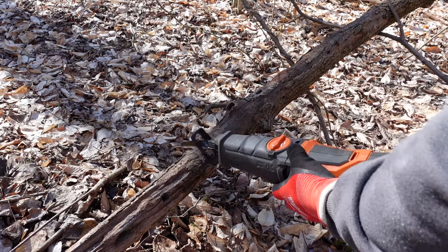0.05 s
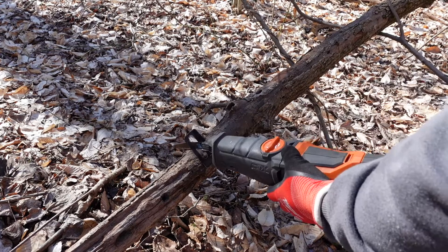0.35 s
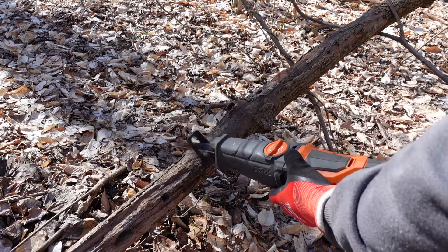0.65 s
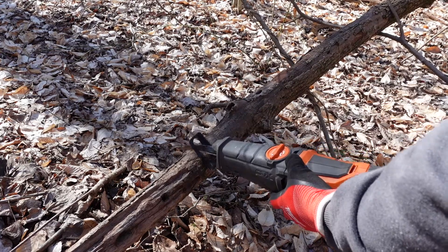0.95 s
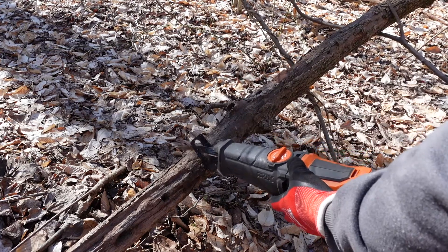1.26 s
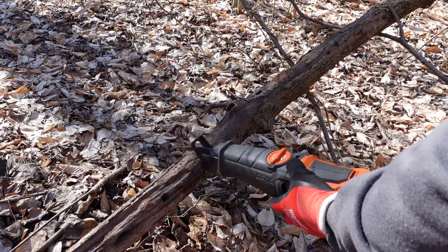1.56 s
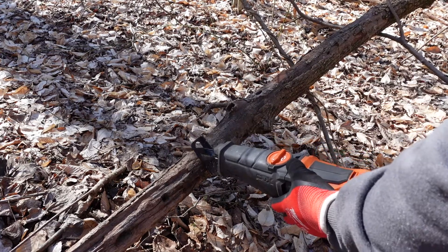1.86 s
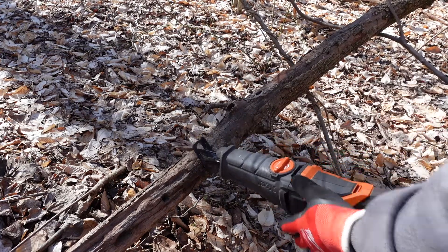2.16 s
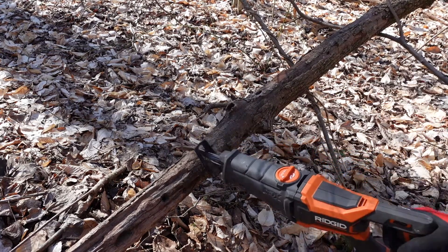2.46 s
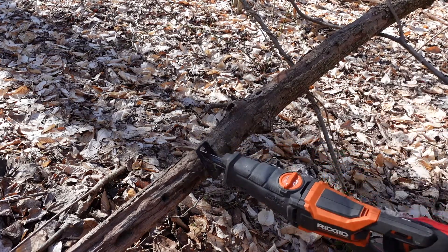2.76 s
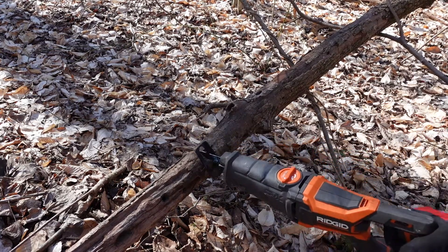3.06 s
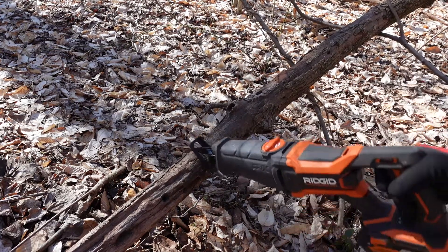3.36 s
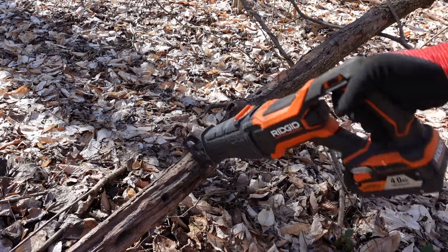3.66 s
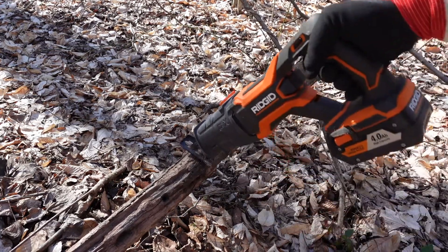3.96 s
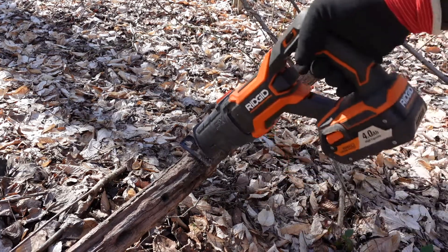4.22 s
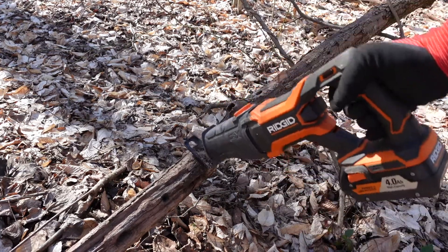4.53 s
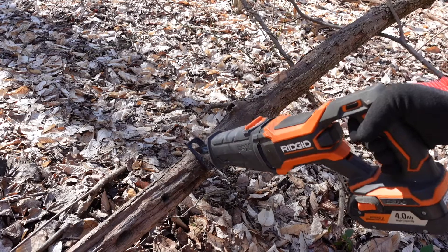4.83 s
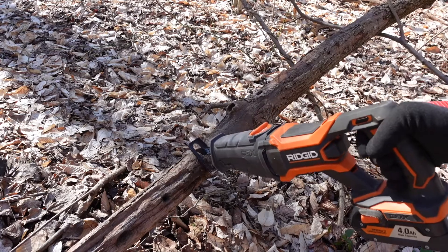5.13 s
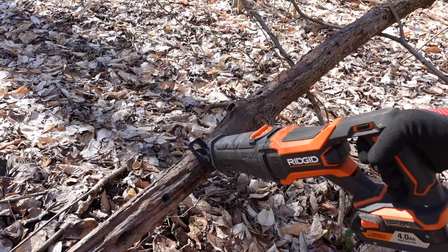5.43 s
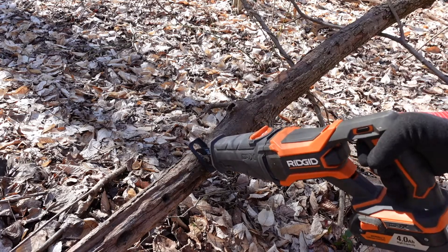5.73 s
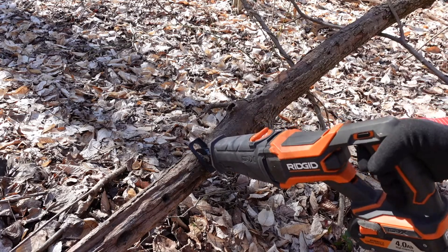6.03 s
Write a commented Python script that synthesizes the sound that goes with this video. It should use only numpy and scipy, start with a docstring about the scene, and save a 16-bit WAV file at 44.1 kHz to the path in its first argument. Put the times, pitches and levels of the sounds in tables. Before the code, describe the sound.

A cordless reciprocating saw rasps through a log close by, jamming three times with a sliding gear whine, the last one holding.

```python
"""A leafy forest floor: a cordless reciprocating saw with a failing drive cuts a log, close by.
Each stroke clatters in the gear housing, shakes the log and rasps in the cut; under load the gear
teeth skip in short chirps. Three times the blade jams and the teeth skip without pause: a whine that
slides down as the motor sags and, in the last jam, holds. Leaves stir and the trigger clicks first;
faint air and a low hum lie behind."""
import sys
import numpy as np
from scipy import signal
from scipy.fft import rfft, irfft, next_fast_len
from scipy.io import wavfile
from scipy.ndimage import uniform_filter1d, minimum_filter1d

SR = 44100
rng = np.random.default_rng(int(sys.argv[2]) if len(sys.argv) > 2 else 0)


def wav_record(signal):
    """Record a signal, one row per channel, as 16-bit PCM in the file named by sys.argv[1]."""
    frames = np.transpose(np.atleast_2d(signal))
    bounded = np.clip(frames, -1, 1)
    # unit amplitude maps onto the largest positive 16-bit level
    quanta = np.round(bounded * 32767).astype(np.int16)
    wavfile.write(sys.argv[1], SR, quanta)


N = 268436
TIME = np.arange(N) / SR
MOTOR_ON_S = 0.42

# Motor pace, first and second spell. Each row: time in seconds, strokes per second.
PACE_FIRST = [(0.42, 29.909), (0.563, 35.831), (0.646, 41.428), (1.065, 40.815), (1.366, 36.644),
              (1.467, 34.457), (2.044, 32.887), (2.258, 34.563), (2.353, 31.606), (2.81, 27.714),
              (3.0, 28.151)]
PACE_SECOND = [(3.52, 16.657), (3.677, 31.283), (3.995, 39.901), (4.297, 40.833), (4.567, 35.657),
               (4.72, 27.954), (4.873, 27.951), (5.1, 24.124)]
def sawing(pace, clatter, blade_modes, lead_turns, return_turns,
           chirp_db, ring_db, clatter_db, log_db, rasp_db):
    """One spell of cutting: the strokes drive gears, log and blade. A slower saw is more loaded."""
    rate, = curves(pace)
    start_s, end_s = pace[0][0], pace[-1][0]
    turns = np.cumsum(rate * (TIME > start_s)) / SR + lead_turns
    load = np.clip((41 - rate) / (41 - 28), 0, 1)  # free at 41 strokes/s, full load at 28
    swing = (turns + .014 * wander(48.6) + .5) % 1 - .5
    pull, force, snap = strokes(rate, turns, swing, load, return_turns)
    tooth_turns, chirps = tooth_chirps(swing, load)
    skip_share = np.clip(amp(chirp_db) * load ** 0.72 * pull, 0, .85)
    gears = gear_clatter(force + .35 * snap, load, skip_share, tooth_turns, clatter, blade_modes, ring_db)
    gears += skip_share * force * chirps
    sound = amp(clatter_db) * gears + log_body(force, load, log_db) + rasp(force, snap, load, rasp_db)
    spin_up = np.clip((TIME - MOTOR_ON_S) / 0.12, 0, 1)
    return during(start_s - .003, end_s - .006, fade_s=0.036) * amp(-8.5 * (1 - spin_up ** 3)) * sound


# The saw bucks as it bites: long and short pulls alternate.
# Each row: time in seconds, change of pull length as a fraction.
BUCKING = [(1.27, 0.21), (1.42, 0.61), (1.5, 0.36), (1.66, 0.044)]
def strokes(rate, turns, swing, load, return_turns, snap_s=0.0025):
    """Stroke envelopes: the gears take up slack with a snap, pull, let go and knock on the return."""
    buck, = curves(BUCKING)
    centre = .085 - 0.11 * np.sqrt(load)
    half_width = (0.13 + 0.11 * np.sqrt(load)) * (1 - buck * np.cos(np.pi * turns))
    since_bite = swing - centre + half_width
    until_release = centre + half_width - swing
    pull = (1 + np.tanh(since_bite / .026)) * (1 + np.tanh(until_release / .045)) / 4
    return_knock = bump(swing, -return_turns - 0.068 * load, .09 - 0.067 * load)
    return_knock *= (.7 - 0.55 * load) * amp(1.5 * wander(26))
    force = (.36 - 0.085 * load + pull + return_knock) * amp(2.34 * wander(194))
    gears_catch_s = SLIPS[0][1]
    force **= np.clip((TIME - gears_catch_s) / 0.019 + 1, .2, 1)  # strokes stand out from here on
    force /= np.sqrt(uniform_filter1d(force ** 2, 5000))
    snap = np.exp(-(since_bite % 1) / rate / snap_s) * amp(2 * wander(18))
    return pull, force, snap


def tooth_chirps(swing, load):
    """Gear teeth skip under load, fastest mid-pull. Returns tooth phase and tone."""
    peak_hz = 890 + 380 * np.clip(1 - 1.9 * load, 0, 1)
    tooth_hz = peak_hz * np.exp(-3.4 * (swing + .04) ** 2 + .06 * wander(21.95))
    tooth_turns = np.cumsum(tooth_hz) / SR + 0.0095 * wander(525)
    tone = sum(np.cos(2 * np.pi * (k * tooth_turns + rng.random())) * amp(db + 5.9 * wander(54))
               for k, db in enumerate([4.5, 4.5, 5.5, 0.0, -3.5, -23.5], 1))
    return tooth_turns, unit(tone)


# Gear clatter spectrum per spell. Each row: frequency in Hz, relative level in dB.
GEARS_FIRST = [(290, -34), (500, -21), (821, -7.5), (972, -8.5), (1220, -2), (1640, -2.5), (2030, -2.5),
               (2350, -4), (2780, -5), (4100, -8), (4740, -10.5), (6980, -14.5), (9000, -21.5),
               (11700, -41), (19800, -120)]
GEARS_SECOND = [(290, -55), (500, -16.5), (821, -5), (961, -3.5), (1450, -1.5), (1940, 2.5), (2440, -0.5),
                (3420, 1), (4360, -5), (5040, -3.5), (5680, -9.5), (6340, -7.5), (9000, -16.5),
                (11700, -32), (19800, -120)]
# Modes of the housing and, per spell, the free blade. Each row: centre in Hz, width in Hz, gain in dB.
HOUSING_MODES = [(776, 23, -2), (11350, 150, 0)]
BLADE_MODES_FIRST = [(2470, 240, 0), (9300, 990, 0)]
BLADE_MODES_SECOND = [(2180, 300, 7), (6100, 300, 1.8)]
def gear_clatter(force, load, skip_share, tooth_turns, spectrum, blade_modes, ring_db):
    """Gear blows ring housing and blade; wood damps the blade as the cut tightens."""
    tooth_beat = unit(1 + 0.46 * skip_share * np.cos(2 * np.pi * tooth_turns))
    blows = impacts(6500, 2.16) * force * np.sqrt(1 - skip_share ** 2) * tooth_beat
    blade_share = np.clip(amp(ring_db) * (1 - load) ** 2, 0, 1)
    housing = colour(blows * (1 - blade_share), spectrum, HOUSING_MODES)
    return housing + colour(blows * blade_share, spectrum, blade_modes)


# Log body spectrum. Each row: frequency in Hz, relative level in dB.
LOG_SPECTRUM = [(40, -29), (100, -21.5), (200, -9), (330, -4), (480, 3.5), (620, 7.5), (900, -8)]
def log_body(force, load, level_db, full_load_db=-8.5):
    """Strokes shake the log, less under load as the blade removes less wood."""
    blows = impacts(2500, 3.1) * force ** 0.53
    return amp(level_db + full_load_db * load ** 1.43) * colour(blows, LOG_SPECTRUM)


# Spectrum of the cut. Each row: frequency in Hz, relative level in dB.
RASP_SPECTRUM = [(5000, -59), (7500, -8), (9200, 2.5), (10600, -2.5), (11400, -4), (12500, -5.5),
                 (15500, -14.5)]
def rasp(force, snap, load, level_db, full_load_db=-2.5):
    """The blade tears off chips: a high hiss, sharpest as each pull starts."""
    chips = impacts(14000, 4.5) * (force ** 0.73 + 1.14 * snap)
    return amp(level_db + full_load_db * load) * colour(chips, RASP_SPECTRUM, HOUSING_MODES)


# Unbroken tooth skipping: once at start-up, then three jams. Each row: start and end in seconds,
# catch and held rate in Hz, sag time in seconds, end rate in Hz, collapse time in seconds,
# then gains in dB of the rattle and of partials 1, 2, 3 and above.
SLIPS = [(0.443, 0.515, 850, 1475, 0.019, 830, 0.024, -25, -2, -13, -20, -6),
         (2.997, 3.163, 1660, 1440, .09, 759.4, .04, -20, 2, -5, 0, 2),
         (3.186, 3.512, 1600, 1375, 0.044, 780, .115, -21.5, -3, -1.5, 1.5, -1),
         (5.096, 6.114, 1730, 962.8, .073, 944, .02, -21, -5.5, 3, 0.5, -1)]
def jams(limp_at_s=5.16, limp_rise_s=.19, limp_droop=.037, thud_db=-64):
    """Gear teeth ratchet: whine, rattle, thud. The last jam limps, every second tooth striking harder."""
    gates = np.array([during(*row[:2]) for row in SLIPS])
    tooth_hz = np.choose(gates.argmax(0), [skipping_rate(*row[:7]) for row in SLIPS])
    rattle_gain, *partial_gains = amp([row[7:] for row in SLIPS]).T @ gates
    limp = 1 - np.exp(-(np.maximum(TIME - limp_at_s, 0) / limp_rise_s) ** 1.396)
    runout = (.014 - .007 * limp) * np.sin(2 * np.pi * 13.5 * TIME)  # the wheel runs out of true
    wobble = runout + .004 * wander(49) + .004 * wander(8)
    jitter_turns = (0.027 + 0.01 * limp) * wander(210)
    tooth_turns = np.cumsum(tooth_hz * (1 + wobble - limp_droop * limp)) / SR + jitter_turns
    whine = jam_whine(tooth_hz, tooth_turns, limp, partial_gains)
    rattle = jam_rattle(tooth_turns, limp)
    thud = amp(thud_db) * gates.sum(0) * colour(impacts(2800, 1.3), LOG_SPECTRUM)
    in_step = sum(during(start + .008, end - .008, fade_s=.016) for start, end, *_ in SLIPS)
    return in_step * whine + rattle_gain * rattle + thud


def skipping_rate(start_s, end_s, catch_hz, held_hz, sag_s, end_hz, collapse_s):
    """Tooth rate in Hz: the motor is pulled to the pace the slipping teeth allow, then drops at the end."""
    age_s = np.clip(TIME - start_s, 0, end_s - start_s)
    left_s = np.maximum(end_s - TIME, 0)
    hz = held_hz + (catch_hz - held_hz) * np.exp(-(age_s / sag_s) ** 1.8)
    return hz * (1 - (1 - end_hz / held_hz) * np.exp(-left_s / collapse_s))


# Radiation of the saw's body. Each row: frequency in Hz, gain in dB.
BODY_RADIATION = [(800, -19.5), (960, -21.5), (1100, -23), (1270, -29.5), (1420, -22), (1570, -21),
                  (1720, -21), (1870, -17.5), (2060, -28), (2450, -15.5), (2780, -19), (3020, -21.5),
                  (3300, -20), (3650, -26.5), (4100, -32.5), (4650, -28.5), (5150, -25.5), (5750, -37.5),
                  (6400, -31), (7000, -30), (8200, -34.5), (9600, -34), (12000, -46)]
# At full limp: gain change in dB of partials 1, 2, 3 and above; level in dB of orders 0.5 to 3.5.
LIMP_GAINS_DB = [1, -8.5, 0, -2.5]
HALF_ORDERS_DB = [-47, -35.5, -25, -29]
def jam_whine(tooth_hz, tooth_turns, limp, partial_gains):
    """Tooth harmonics slide through the body's resonances; the limp adds half orders."""
    def partial(order):
        return np.sqrt(2) * np.cos(2 * np.pi * (order * tooth_turns + rng.random())) * amp(1.65 * wander(69))

    def radiated(order):
        group = min(int(order), len(partial_gains)) - 1
        hz = order * tooth_hz
        db = db_at(BODY_RADIATION, hz) + LIMP_GAINS_DB[group] * limp + 1.9 * wander(10.5)
        return partial_gains[group] * amp(db) * partial(order) / (1 + (hz / 9000) ** 6)

    harmonics = sum(radiated(k) for k in range(1, 10))
    high_halves = sum(radiated(k + .5) for k in range(4, 10))
    low_halves = sum(amp(db) * partial(k + .5) for k, db in enumerate(HALF_ORDERS_DB))
    return harmonics + limp * (high_halves + low_halves)


# Gear rattle spectrum. Each row: frequency in Hz, relative level in dB.
RATTLE_SPECTRUM = [(100, -60), (300, -35), (550, -13), (750, -3.5), (1100, -2), (1500, 2), (2000, 8),
                   (2700, 9), (3700, 3.5), (5200, 3), (7000, -0.5), (9000, -5.5), (12000, -9), (15500, -19)]
# Jammed blade modes. Each row: centre in Hz, width in Hz, gain in dB.
JAMMED_MODES = [(770, 26, 16.5), (2657, 209, -6.5), (4630, 140, -14), (5328, 138, -9), (6984, 180, -5),
                (8880, 260, 1)]
def jam_rattle(tooth_turns, limp):
    """Blows in step with the teeth; the limp moves the ringing from housing to blade."""
    beat = (1 + 0.12 * np.cos(2 * np.pi * tooth_turns)) * (1 + 0.75 * limp * np.cos(np.pi * tooth_turns))
    blows = impacts(12000, 1.2) * beat * amp(1.9 * wander(100))
    housing = colour(blows * np.sqrt(1 - limp), RATTLE_SPECTRUM, HOUSING_MODES)
    blade = colour(impacts(12000, 2.0) * beat * np.sqrt(limp), RATTLE_SPECTRUM, JAMMED_MODES)
    return housing + blade


def freewheel(level_db=-23):
    """The gears rattle unloaded between the first two jams."""
    return amp(level_db) * during(SLIPS[1][1], SLIPS[2][0]) * colour(impacts(5250, 2.4), RATTLE_SPECTRUM)


# Trigger, shoe and catching gears. Each row: start in seconds, level in dB, decay in seconds.
METAL_KNOCKS = [(0.326, -44, .003), (0.378, -40, 0.0066), (0.394, -32, 0.0091), (0.42, -23, 0.016),
                (2.99, -7, 0.0061), (3.187, -8, 0.0084), (3.517, -17, 0.0024), (5.095, -14.5, 0.0042)]
# Trigger mode. Each row: centre in Hz, width in Hz, gain in dB.
TRIGGER_MODES = [(1770, 220, 19)]
def knocks():
    """Bursts of metal contact ring the trigger before the motor runs, the housing after."""
    force = sum(amp(db) * (TIME >= start_s) * np.exp(-abs(TIME - start_s) / decay_s)
                for start_s, db, decay_s in METAL_KNOCKS)
    blows = force * impacts(9000, 3.7)
    running = TIME > MOTOR_ON_S
    housing = colour(blows * running, GEARS_FIRST, HOUSING_MODES)
    return housing + colour(blows * ~running, GEARS_FIRST, TRIGGER_MODES)


# Leaf stirs. Each row: centre in seconds, level in dB, half-width in seconds.
LEAF_STIRS = [(0.016, -60, 0.025), (0.135, -65, .007), (0.244, -66, 0.012)]
def leaves():
    """Dry leaves crackle as the saw is set on the log."""
    stir = sum(amp(db) * np.exp(-((TIME - at_s) / width_s) ** 2) for at_s, db, width_s in LEAF_STIRS)
    return colour(stir * impacts(2500, 3.7), [(1200, -2), (2500, 0), (6000, -2), (14000, -12)])


def forest_scatter(x, wet_db=-25, t60_s=0.2):
    """Faint reflections off leaves and trunks, much alike on both sides."""
    t = np.arange(SR // 3) / SR
    noise = rng.standard_normal(len(t)) + 0.1 * rng.standard_normal((2, len(t)))
    tail = noise * amp(-60 * t / t60_s) * (t > .002)
    return amp(wet_db) * signal.fftconvolve(x[None], tail / np.linalg.norm(tail[0]), axes=1)[:, :N]


def low_rumble(level_db=-74):
    """A faint low rumble while the saw runs."""
    rumble = colour(rng.standard_normal(N), [(20, 1), (70, -2), (160, -4), (300, 0)])
    return amp(level_db) * during(MOTOR_ON_S, SLIPS[-1][1]) * rumble


# Forest air spectrum. Each row: frequency in Hz, relative level in dB.
AIR_SPECTRUM = [(18, -31), (30, -12), (132, -8.5), (205, -19), (281, -25), (328, -30), (552, -29),
                (754, -17.5), (1060, -14), (1240, -20), (1520, -19), (1830, -27), (3150, -34),
                (6530, -36.5), (15000, -48)]
# Fade of air and hum. Each row: time in seconds, gain in dB.
BACKGROUND_FADE = [(0, -63.5), (.42, -60), (.52, -82)]
def background(hum_hz=68):
    """Still air and a low hum, both sinking away once the saw runs."""
    gain_db, = curves(BACKGROUND_FADE)
    hum = np.sqrt(2) * np.sin(2 * np.pi * hum_hz * TIME + .2 * wander(8)) * (TIME > .035)
    air = colour(rng.standard_normal(N), AIR_SPECTRUM)
    return amp(gain_db) * (amp(3) * air + amp(2) * hum)


# Stereo balance. Each row: frequency in Hz, left minus right in dB.
BALANCE = [(300, 0), (900, -.6), (2200, -.9), (4000, -.6), (5500, -.7), (7000, 0), (15000, 0)]
def placed(x, sway=0.93, flutter=0.014):
    """Sets a sound slightly right, band by band; the balance sways and flutters."""
    side_db = db_at(BALANCE, np.fft.rfftfreq(N, 1 / SR))
    side = irfft(rfft(x) * (amp(side_db / 2) - 1), N) * (1 + sway * wander(9.3))
    side += flutter * x * wander(40)
    return np.array([x + side, x - side])


def amp(db):
    return 10 ** (np.asarray(db) / 20)


def unit(x):
    return x / np.sqrt(np.mean(x ** 2) + 1e-20)


def curves(rows):
    """Table columns, interpolated over time."""
    times_s, *columns = np.transpose(rows)
    return [np.interp(TIME, times_s, column) for column in columns]


def db_at(spectrum, hz):
    """A spectrum, interpolated over log frequency."""
    points_hz, db = np.transpose(spectrum)
    return np.interp(np.log(hz + 1), np.log(points_hz), db)


def during(start_s, end_s, fade_s=.005):
    """Soft-edged gate."""
    return np.clip(np.minimum(TIME - start_s, end_s - TIME) / fade_s + .5, 0, 1)


def bump(turns, centre, half_width):
    """One Gaussian bump per turn."""
    return np.exp(-(((turns - centre + .5) % 1 - .5) / half_width) ** 2)


def wander(cutoff_hz):
    """Low-passed random drift, rms 1."""
    grid_s = np.arange(0, 8, 1 / 4096)
    hz = np.fft.rfftfreq(len(grid_s), grid_s[1])
    drift = irfft(rfft(rng.standard_normal(len(grid_s))) * np.exp(-(hz / cutoff_hz) ** 2))
    return np.interp(TIME, grid_s, unit(drift))


def impacts(per_s, spread_db):
    """Tiny blows of random time, size and sign, rms 1."""
    size = amp(spread_db * np.minimum(rng.exponential(1, N), 3)) * rng.choice([-1, 1], N)
    return unit(size * (rng.random(N) < per_s / SR))


def colour(x, spectrum, modes=()):
    """Filters by a spectrum and ringing modes, keeping the power of white noise."""
    size = next_fast_len(N + 8192)
    hz = np.fft.rfftfreq(size, 1 / SR) + 1
    points_hz, db = np.transpose(spectrum)
    octaves_out = np.maximum(np.log2(points_hz[0] / hz), 0) + np.maximum(np.log2(hz / points_hz[-1]), 0)
    gain = amp(np.interp(np.log(hz), np.log(points_hz), db) - 32 * octaves_out)
    gain = gain * (1 + sum(amp(d) / (1 + 2j * (hz - centre) / width) for centre, width, d in modes))
    return irfft(rfft(x, size) * unit(abs(gain)) * np.exp(1j * np.angle(gain)), size)[:N]


def scene():
    """Two spells of sawing, the jams and the small sounds, set in the forest."""
    saw = sawing(PACE_FIRST, GEARS_FIRST, BLADE_MODES_FIRST, lead_turns=0.01176, return_turns=.3,
                 chirp_db=-4.5, ring_db=-5.0, clatter_db=-14.0, log_db=-33.0, rasp_db=-29.5)
    saw += sawing(PACE_SECOND, GEARS_SECOND, BLADE_MODES_SECOND, lead_turns=.138, return_turns=0.31,
                  chirp_db=-4.0, ring_db=-7.5, clatter_db=-14.0, log_db=-37.5, rasp_db=-31.5)
    close = saw + jams() + freewheel() + knocks() + leaves()
    return placed(close) + forest_scatter(close) + background() + low_rumble()


def record(dry, ceiling=0.59, low_cut_hz=69, high_cut_hz=15800):
    """Fast peak limiter, low cut, high cut."""
    gain = np.minimum(1, ceiling / (abs(dry).max(0) + 1e-9))
    held_gain = minimum_filter1d(gain, size=161)
    smooth_gain = uniform_filter1d(uniform_filter1d(held_gain, size=81), size=81)
    low_cut = signal.butter(2, low_cut_hz, "high", fs=SR, output="sos")
    high_cut = signal.firwin(511, high_cut_hz, window=("kaiser", 9), fs=SR)
    return signal.oaconvolve(signal.sosfilt(low_cut, dry * smooth_gain), high_cut[None], "same")


dry = scene()
out = record(dry)
wav_record(out)
```